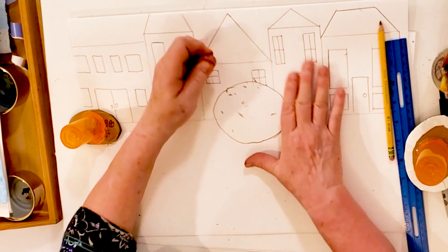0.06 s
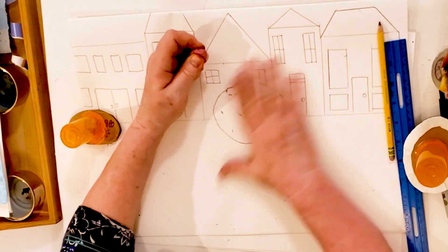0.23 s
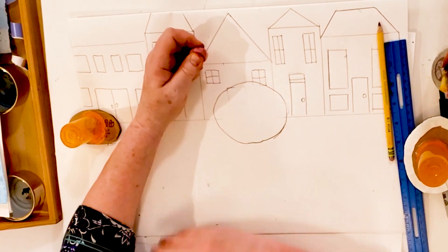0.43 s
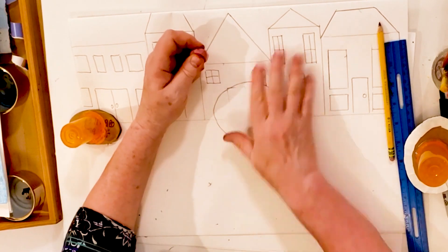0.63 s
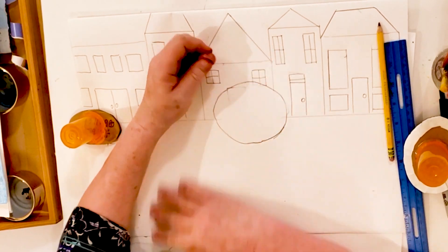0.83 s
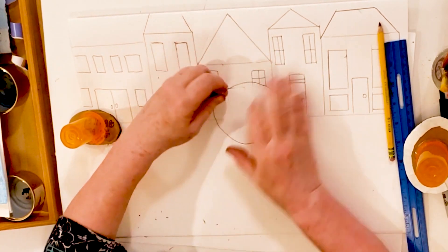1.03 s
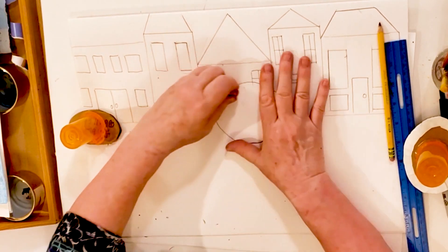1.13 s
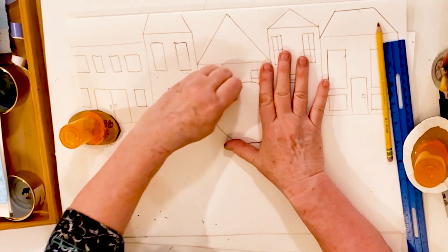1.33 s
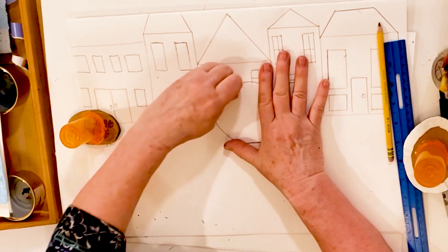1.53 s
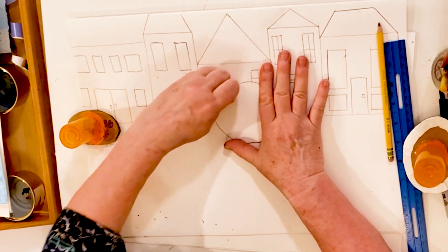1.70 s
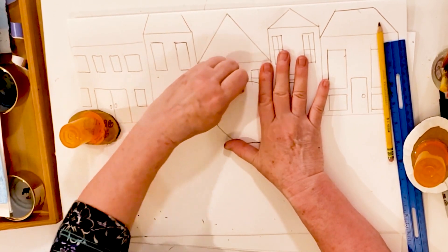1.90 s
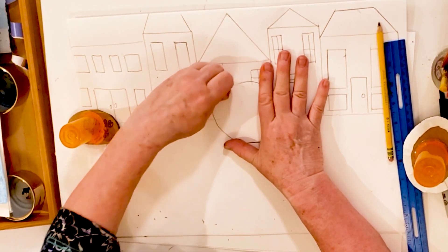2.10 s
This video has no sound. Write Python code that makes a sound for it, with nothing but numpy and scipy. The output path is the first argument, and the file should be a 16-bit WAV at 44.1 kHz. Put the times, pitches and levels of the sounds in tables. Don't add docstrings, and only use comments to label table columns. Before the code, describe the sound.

A bare palm brushes crumbs off drawing paper in two quick airy swishes with soft paper scuffs, then after a pause an eraser makes one short stuttering rub. Close microphone in a small quiet room with low hum.

```python
import sys
import numpy as np
from scipy import signal
from scipy.fft import rfft, irfft, next_fast_len
from scipy.io import wavfile
from scipy.ndimage import map_coordinates

SR = 44100
rng = np.random.default_rng(int(sys.argv[2]) if len(sys.argv) > 2 else 0)


def transcribe(signal):
    frames = np.atleast_2d(signal).T
    limited = np.clip(frames, -1, 1)
    pcm = np.round(limited * 32767).astype(np.int16)
    wavfile.write(sys.argv[1], SR, pcm)


def magnitude_from_level(level_db):
    exponent = np.asarray(level_db, float) / 20
    return 10 ** exponent


N = 94815
T = np.arange(N) / SR


def unit(x):
    return x / np.sqrt(np.mean(x ** 2) + 1e-20)


def along(points, hz):
    f, v = np.transpose(points)
    return np.interp(np.log(hz + 1), np.log(f + 1), v)


def wobble(rate_hz):
    knots = rng.standard_normal(int(N * rate_hz / SR) + 4)
    return map_coordinates(knots, [T * rate_hz])


def filtered(x, response):
    m = next_fast_len(N + SR // 2)
    spectrum = rfft(x, m) * response(np.fft.rfftfreq(m, 1 / SR))
    return irfft(spectrum, m)[..., :N]


def resonance(f, hz, width):
    return 1j * f * width / (hz * hz - f * f + 1j * f * width)


# frequency in Hz, left-right likeness from 0 to 1.
LIKENESS = [(60, 0.96), (150, 0.96), (300, 0.84), (600, 0.34), (1200, 0.013)]


def stereo(pair, spectrum, pan):
    def turn(hz):
        return np.arccos(np.clip(along(LIKENESS, hz), -1, 1)) / 2

    def shared_and_opposed(hz):
        return magnitude_from_level(along(spectrum, hz)) * [np.cos(turn(hz)), np.sin(turn(hz))]

    def lean(hz):
        return magnitude_from_level(np.outer([.5, -.5], along(pan, hz)))

    shared, opposed = filtered(pair, shared_and_opposed)
    out = filtered(np.array([shared + opposed, shared - opposed]), lean)
    return out / np.std(out.mean(0))


def grains(clump_hz, clump_db):
    size_db = 1.2 * rng.exponential(size=N)
    size_db += clump_db * np.clip(wobble(clump_hz), -2, 2)
    return magnitude_from_level(size_db) * rng.standard_normal((2, N))


# frequency in Hz, level in dB.
MAINS = [(59.5, -63), (119.5, -55.5), (240, -68), (362, -67)]
# frequency in Hz, density in dB per Hz.
AIR = [(15, -85), (25, -44), (43, -13.5), (119, -5.5), (145, -13.5), (243, -11), (334, -18.5), (369, -12.5),
       (700, -42.5), (910, -101), (1540, -120)]
# frequency in Hz, density in dB per Hz.
ROOM_HISS = [(330, -33), (560, -7.5), (1100, -14.5), (2000, -19.5), (5500, -29.5), (9500, -30),
             (11500, -20), (15700, -16)]
# frequency in Hz, left over right in dB.
ROOM_PAN = [(60, -1), (200, -2.5), (500, -3.5), (2000, -2.5), (6000, -3), (15000, 0.5)]


def room_tone():
    tones = np.zeros(N)
    for hz, db in MAINS:
        level = np.sqrt(2) * magnitude_from_level(db + 3 * wobble(13))
        phase = .5 * wobble(5.8) + 9 * rng.random()
        tones += level * np.sin(2 * np.pi * hz * T + phase)
    air_db = -54.5 + 0.4 * wobble(4.66)
    air = magnitude_from_level(air_db) * stereo(rng.standard_normal((2, N)), AIR, ROOM_PAN)
    hiss_db = -69 + .8 * wobble(6)
    hiss = magnitude_from_level(hiss_db) * stereo(rng.standard_normal((2, N)), ROOM_HISS, ROOM_PAN)
    return tones * magnitude_from_level([[-.4], [.4]]) + air + hiss


# frequency in Hz, decay time t60 in seconds.
WALLS = [(300, 0.24), (1500, 0.23), (5000, 0.23), (14000, 0.17)]


def walls(x):
    hz, t, z = signal.stft(rng.standard_normal((2, SR // 3)), SR, nperseg=256)
    decay = magnitude_from_level(-60 * t / along(WALLS, hz)[:, None])
    tail = signal.istft(z * decay, SR, nperseg=256)[1]
    return signal.fftconvolve(x, tail / np.linalg.norm(tail[0]), axes=1)[:, :N]


# peak time in seconds, level in dB, rise in seconds, fall in seconds, pitch in Hz.
SCUFFS = [(0.119, -53.5, 0.0056, 0.033, 840), (.122, -57.5, .012, 0.045, 1230),
          (0.134, -49, 0.024, 0.054, 348), (0.198, -55.5, 0.011, 0.03, 1330),
          (0.212, -51.5, 0.026, 0.087, 260), (0.296, -51, 0.022, 0.067, 870), (.31, -57, .04, 0.063, 390),
          (.345, -48, 0.034, 0.033, 1264), (.79, -72, 0.082, .07, 940), (1.215, -65.5, 0.024, 0.038, 1550),
          (1.1, -81.5, 0.1, 0.34, 1090), (1.7, -63, 0.088, 0.044, 320)]


def scuffs():
    q, pan = 1.92, [(200, -0.028), (800, -2.5)]
    out = np.zeros((2, N))
    for at, db, rise, fall, hz in SCUFFS:
        distance = np.where(T < at, (at - T) / rise, (T - at) / fall)
        shape = magnitude_from_level(db - 9.1 * distance ** 1.09)
        rub = stereo(grains(clump_hz=122.6, clump_db=0.5), [(100, 0)], pan)
        ringing = filtered(rub, lambda f: resonance(f, hz, hz / q) ** 2)
        out += shape * unit(ringing)
    return out


# time in seconds, force in dB.
STROKE = [
    (1.612, -49),
    (1.622, -46.5),
    (1.635, -44.5),
    (1.651, -42),
    (1.67, -49),
    (1.701, -56.5),
]
# time in seconds, extra force in dB.
CATCHES = [
    (1.611, 7),
    (1.637, 6),
    (1.647, 3),
    (1.673, 4),
]
# frequency in Hz, width in Hz, level in dB (all ring equally here).
BOARD = [(900, 65, 0), (1050, 21, -2), (1424, 64, -1), (1600, 120, -1), (2820, 110, -10), (3850, 200, -10),
         (4010, 67, -11), (6400, 27, -17)]
# frequency in Hz, density in dB per Hz.
RUBBER = [(350, -34), (600, -10), (1000, -1), (1700, -4.5), (2100, -11.5), (4200, -14.5), (6000, -20),
          (14000, -17.5), (15500, -30)]
# frequency in Hz, left over right in dB.
RUBBER_PAN = [(300, -1), (1300, -3.5), (4400, -3.5), (8000, -4), (15000, -1)]


def eraser():
    grip_s, catch_s = 1.6105, 0.0023
    s, force_db = np.transpose(STROKE)
    catch_db = sum(db * np.exp(-((T - at) / catch_s) ** 2) for at, db in CATCHES)
    release_db = 233 * np.maximum(T - s[-1], 0)
    force = (T > grip_s) * magnitude_from_level(np.interp(T, s, force_db) + catch_db - release_db)
    rub = stereo(grains(clump_hz=260, clump_db=1.2), RUBBER, RUBBER_PAN)

    def board(f):
        return 0.62 + sum(0.66 * resonance(f, hz, width) for hz, width, _ in BOARD)

    return force * unit(filtered(rub, board)) * 1.275


# time in seconds, friction level in dB, weight of the hand in dB, contact area in dB.
PALM = [(0, -81, -10, 8), (.094, -55.5, -7, -11), (.194, -52, -9.5, -9), (.238, -38, -9, -12),
        (.298, -27.5, -15.5, -2), (.35, -32.5, -14, 1), (.4, -44, -10.5, -1), (.572, -93, -6, -8),
        (.628, -59.5, -22, -12), (0.687, -61.5, -12.5, -12), (.768, -32.5, -17.5, -5),
        (.788, -29, -18.5, 0), (0.862, -42, -11, -4.5), (0.945, -66.5, -9, -5),
        (1.024, -53.5, -14.5, -10.5), (1.155, -63, -16, -11), (1.2, -55, -5, -3.5), (1.3, -84, -1.5, 2)]
# time in seconds, level in dB, half length in seconds.
RUBS = [
    (1.398, -80, 0.037),
    (1.912, -81.5, 0.044),
    (2.074, -78.5, 0.03),
]
# frequency in Hz, density in dB per Hz.
SKIN = [(5600, -42), (6300, -21), (8000, -15), (10200, -11), (11500, -2), (13000, -4.5), (15100, 0),
        (15800, -3)]
# frequency in Hz, density in dB per Hz.
RASP = [(4300, -21), (4900, -9.5), (6500, -1.5), (8000, -0.5), (11000, -6)]
# frequency in Hz, density in dB per Hz.
DRAG = [(1100, -24), (1700, -9.5), (2450, -17), (2900, -8.5), (3800, -1.5), (5000, -1), (6500, -10)]
# frequency in Hz, left over right in dB.
SKIN_PAN = [(2000, -3), (4000, -2.5), (6500, -7), (8800, 2), (10300, -2), (11800, 3), (13500, -1),
            (15000, -3.5)]


def palm():
    s, level_db, weight_db, area_db = np.transpose(PALM)
    level = magnitude_from_level(np.interp(T, s, level_db, right=-120) + .8 * wobble(40.6))
    for at, db, half in RUBS:
        level = level + magnitude_from_level(db - 8 * ((T - at) / half) ** 2)
    hiss = magnitude_from_level(1) * stereo(grains(clump_hz=647, clump_db=3), SKIN, SKIN_PAN)
    rasp = stereo(grains(clump_hz=387, clump_db=-0.2), RASP, SKIN_PAN)
    drag = stereo(grains(clump_hz=300, clump_db=0.5), DRAG, SKIN_PAN)
    weight = magnitude_from_level(np.interp(T, s, weight_db))
    area = magnitude_from_level(np.interp(T, s, area_db) - 3.5)
    return level * (hiss + weight * (rasp + area * drag))


def scene():
    near = palm() + scuffs() + eraser()
    return near + magnitude_from_level(-10) * walls(near) + room_tone()


def top_cut(x):
    return signal.sosfilt(signal.butter(12, 16570, fs=SR, output="sos"), x)


def record(dry):
    fade_in_s, top_hz = .04, 15830
    faded = dry * np.clip(.25 + T / fade_in_s, 0, 1)
    mix = filtered(faded, lambda hz: hz < top_hz)
    return top_cut(mix)


dry = scene()
out = record(dry)
transcribe(out)
```